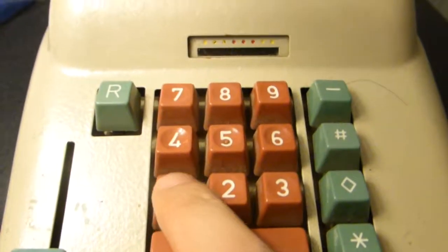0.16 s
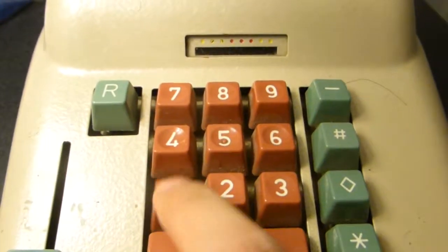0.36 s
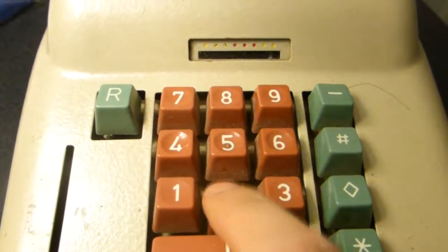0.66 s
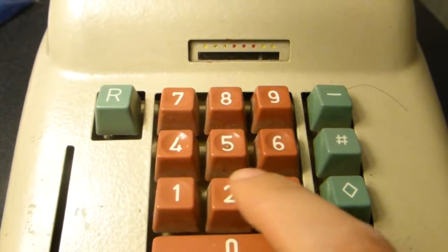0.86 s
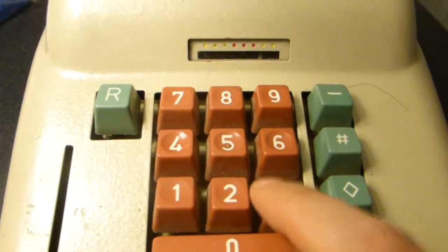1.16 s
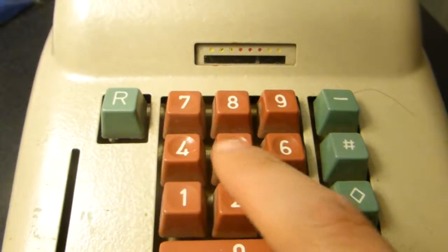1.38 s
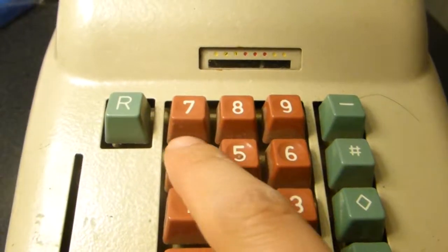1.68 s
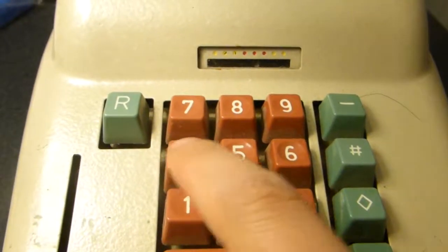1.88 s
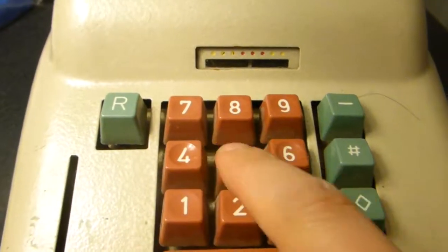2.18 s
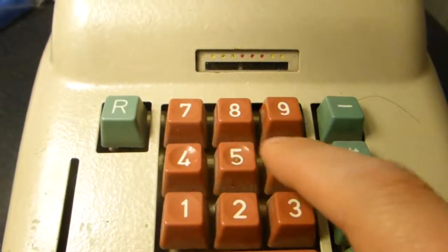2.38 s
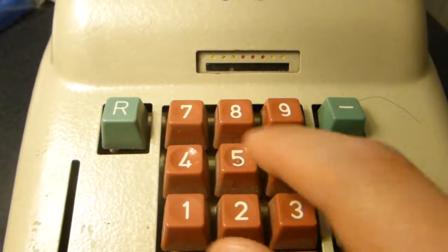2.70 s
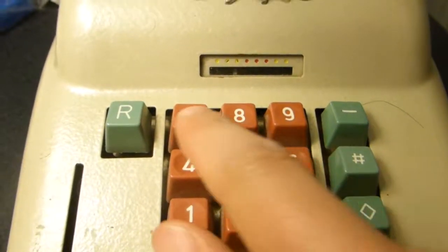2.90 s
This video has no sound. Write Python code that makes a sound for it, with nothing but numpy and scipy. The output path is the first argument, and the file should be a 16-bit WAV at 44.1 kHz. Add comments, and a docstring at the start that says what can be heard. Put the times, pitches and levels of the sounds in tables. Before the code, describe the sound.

Mechanical adding machine keys clack sharply, six separate presses and spring-back releases in a quiet room

```python
"""Keys of an old adding machine

A finger types six digits on a mechanical adding machine, close to the microphones in a small quiet room.
Keys trip latches and click the linkage, bottom on their stops, rub in their guides and snap back on springs.
Each contact is a filtered noise crack with the ringing modes of the part and of the steel frame.
The room answers with decaying diffuse noise, over coloured air noise and a low hum that settle in level.
"""
import sys
import numpy as np
from scipy import signal
from scipy.fft import rfft, irfft, next_fast_len
from scipy.io import wavfile
from scipy.ndimage import map_coordinates

SR = 44100
rng = np.random.default_rng(int(sys.argv[2]) if len(sys.argv) > 2 else 0)


def waveform_to_disk(signal):
    """Save audio, clipped to [-1, 1], as 16-bit WAV at the path in sys.argv[1]."""
    frames = np.transpose(np.atleast_2d(signal))
    scaled = np.clip(frames, -1, 1) * 32767
    samples = np.round(scaled).astype(np.int16)
    wavfile.write(sys.argv[1], SR, samples)


N = 134505
T = np.arange(SR // 2) / SR  # time within one contact, s

# Keys meeting their lower stops: (t/s, level/dB, ring f/Hz, low knock/dB, treble/dB)
KEY_STOPS = [(0.273, -14.5, 8330, 2.5, 4), (0.2756, -23, 7900, 11, 12), (0.7409, -15.5, 11460, 5.5, 14.5),
             (0.7462, -16, 7660, -2, 7), (1.1427, -16.5, 11300, -2, 13.5), (1.814, -17, 8960, -12.5, 0.5),
             (1.818, -20, 8170, 0.5, 11), (2.2503, -16.5, 6540, 2.5, 8), (2.255, -17, 7800, 1, 7.5),
             (2.6306, -17.5, 6360, -13, 4), (2.6345, -20.5, 3580, -7, 0)]
# Spectrum of a stop contact: (f/Hz, gain/dB)
STOP_SPECTRUM = [(80, -28), (480, -2.5), (1000, -10.5), (1600, -0.5), (2700, -4), (4500, 5.5), (7500, 1),
                 (12500, -4.5), (15500, -14)]


def presses():
    """Impact excitation: a key bottoms or rebounds, and the blow excites a broadband crack and a ring."""
    out = np.zeros((2, N))
    for start, db, ring_hz, knock_db, treble_db in KEY_STOPS:
        hit = contact(STOP_SPECTRUM, ring_hz, knock_db, treble_db,
                      crack_t60=0.028, case_db=-4.5, ring_db=-3.5, ring_t60=0.014)
        add(out, start, amp(db) * hit)
    return out


# Keys snapping back on their springs: (t/s, level/dB, ring f/Hz, low knock/dB, treble/dB)
KEY_RETURNS = [(0.4889, -11.5, 3800, 3.5, 1), (0.9061, -13.5, 4380, 3, 3), (1.2902, -14.5, 4340, 2.5, -1.5),
               (1.9704, -13.5, 3960.0, -1, 2), (2.375, -15.5, 3720, 2.5, -1), (2.7504, -14.5, 3710, 0.5, 0)]
# Spectrum of a return contact: (f/Hz, gain/dB)
RETURN_SPECTRUM = [(80, -30.5), (600, -4), (1200, -5.5), (1650, 2.5), (2700, -3.5), (3900, 9.5), (5200, 4),
                   (7500, 1), (12500, 2.5), (15500, -4.5)]


def releases(run_up_db=-4):
    """Elastic recoil: the spring throws each key into its upper stop, after a short swell of friction."""
    out = np.zeros((2, N))
    for start, db, ring_hz, knock_db, treble_db in KEY_RETURNS:
        add(out, start - RUN_UP_S, amp(db) * run_up(RUN_UP_S, run_up_db))
        hit = contact(RETURN_SPECTRUM, ring_hz, knock_db, treble_db,
                      crack_t60=0.0058, case_db=-2.5, ring_db=-5, ring_t60=0.02)
        add(out, start, amp(db) * hit)
    return out


# Latches tripping or letting go: (t/s, level/dB, brightness/dB, ring f/Hz)
LATCH_SNAPS = [(0.2111, -20, -0.5, 4500), (0.4271, -23, 1, 9430), (0.7046, -20.5, 12.5, 11170),
               (1.1035, -20, 14, 11200), (1.7742, -24, 0, 7520), (2.2151, -20, 11, 7940),
               (2.3405, -20.5, 12.5, 10530), (2.7137, -18.5, 8.5, 6170)]
# Natural modes shared by the latches: (f/Hz)
LATCH_MODES = [2400, 4050, 7490, 8120, 8740, 11240]


def latches(run_up_db=-14):
    """Modal excitation: each latch snaps with a short crack and sets a fixed group of modes ringing."""
    out = np.zeros((2, N))
    for start, db, bright_db, ring_hz in LATCH_SNAPS:
        add(out, start - RUN_UP_S, amp(db) * run_up(RUN_UP_S, run_up_db))
        snap = contact(CLICK_SPECTRUM, ring_hz, -bright_db / 2, bright_db / 2,
                       crack_t60=0.0098, case_db=-0.5, ring_db=-3.5, ring_t60=0.023,
                       modes_hz=LATCH_MODES, modes_db=-6.5)
        add(out, start, amp(db) * snap)
    return out


# Levers and pawls ticking along the linkage: (t/s, level/dB, brightness/dB)
LINKAGE_CLICKS = [(0.2433, -25.5, -4), (0.2504, -22, -3), (0.4619, -18.5, 1.5), (0.469, -28, 0),
                  (0.6997, -35, 20), (0.7216, -27, 24), (0.7351, -21, 6), (0.8248, -31, 13),
                  (0.8413, -33, 22), (0.8528, -30, 29), (0.8792, -26, 6), (0.885, -27.5, 28),
                  (1.0997, -24, 5), (1.1167, -30.5, 13), (1.1385, -18, 5), (1.2563, -28.0, -2),
                  (1.5313, -44.5, 19), (1.7989, -27.5, -7), (1.938, -26, 2), (2.2121, -19, 4),
                  (2.2296, -21, 6), (2.3502, -23, 18), (2.5938, -22.5, 4.5), (2.624, -23.5, 2),
                  (2.6796, -37.5, -12)]
# Spectrum of small metal contacts and friction: (f/Hz, gain/dB)
CLICK_SPECTRUM = [(100, -22), (450, 0.5), (1000, -8.5), (1700, -2), (4000, 3.5), (6000, 1.5), (11500, 2),
                  (13500, -4.5), (15500, -9)]
PAWL_HZ = 10840  # ring of a small pawl


def linkage():
    """Spectral tilt of light impacts: small levers click, and brighter clicks have less low knock."""
    out = np.zeros((2, N))
    for start, db, bright_db in LINKAGE_CLICKS:
        click = contact(CLICK_SPECTRUM, PAWL_HZ, -bright_db / 2, bright_db / 2,
                        crack_t60=0.0042, case_db=-5, ring_db=-13, ring_t60=0.005)
        add(out, start, amp(db) * click)
    return out


# Key stems rubbing in their guides: (start t/s, end t/s, level/dB)
STEM_SLIDES = [(0.195, 0.209, -35), (0.24, 0.284, -25), (0.445, 0.472, -29), (0.717, 0.758, -27.5),
               (0.852, 0.91, -39.5), (1.1, 1.166, -32), (1.235, 1.286, -36.5), (1.789, 1.837, -26.5),
               (1.867, 1.989, -40), (2.29, 2.382, -37.5), (2.583, 2.631, -32.5), (2.66, 2.765, -37.5)]


def stems():
    """Sliding friction: key stems scrape in their guides, fading in and out at the ends of the motion."""
    out = np.zeros((2, N))
    for start, end, db in STEM_SLIDES:
        count = round(abs(end - start) * SR)
        add(out, start, amp(db) * signal.windows.tukey(count, .3) * scrape(count))
    return out


# Soft knocks of the hollow case: (t/s, level/dB, f/Hz)
CASE_THUDS = [(2.628, -27, 484)]
THUD_T60_S = .07


def thuds():
    """Damped resonance: the hollow case answers with a low decaying sine of gentle onset."""
    out = np.zeros((2, N))
    for start, db, hz in CASE_THUDS:
        envelope = (1 - np.exp(-T * hz)) * fade(THUD_T60_S)
        add(out, start, amp(db) * envelope * np.sin(2 * np.pi * hz * T))
    return out


ATTACK_S, CASE_T60_S = .0003, 0.053  # onset time constant; decay of the case rattle
KNOCK_HZ, TREBLE_HZ = 2580, 8100  # corners of the low and high shelves
# Further modes of each part: level beside the crack, decay and frequency range
PART_MODES_DB, PART_MODES_T60_S, PART_LOW_HZ, PART_HIGH_HZ = -13, 0.027, 3170, 13120
FRAME_HZ, FRAME_DB, FRAME_T60_S = 4350, -38, 0.17  # faint after-ring of the steel frame
RING_BLUR_HZ = 90  # loose parts chatter, which widens their ring


def contact(colour, ring_hz, knock_db, treble_db, crack_t60, case_db, ring_db, ring_t60,
            modes_hz=None, modes_db=PART_MODES_DB):
    """Modal superposition: crack, case rattle, part and frame rings sum with the room's answer."""
    rise = 1 - np.exp(-T / ATTACK_S)
    decay = fade(crack_t60) + amp(case_db) * fade(CASE_T60_S)
    burst = noise(DIRECT_WIDTH, len(T)) * rise * decay
    if modes_hz is None:
        modes_hz = rng.uniform(PART_LOW_HZ, PART_HIGH_HZ, size=6)
    tones = sum(np.sin(2 * np.pi * (hz * T + rng.random())) for hz in modes_hz)
    modes = rise * fade(PART_MODES_T60_S) * tones

    def shelves(hz):
        """Shelving filters: the low knock and the treble are raised or lowered separately."""
        knock = knock_db / (1 + (hz / KNOCK_HZ) ** 4)
        treble = treble_db / (1 + (TREBLE_HZ / (hz + 1)) ** 8)
        return knock + treble

    parts = np.vstack([burst / strike_level(burst), modes / strike_level(modes)])
    parts = coloured(parts, lambda hz: along(colour, hz) + shelves(hz))
    crack, modes = np.split(parts / strike_level(parts[:2]), [2])

    # A random walk in phase widens each spectral line
    wander = np.cumsum(rng.standard_normal(len(T))) * np.sqrt(2 * np.pi * RING_BLUR_HZ / SR)
    ring = rise * fade(ring_t60) * np.sin(2 * np.pi * ring_hz * T + wander)
    frame = amp(FRAME_DB) * fade(FRAME_T60_S) * rise * np.sin(2 * np.pi * FRAME_HZ * T + wander)

    # The blow and the rattle both feed the room
    jolt = signal.unit_impulse(len(T)) + burst[0] / np.linalg.norm(burst[0])
    radiated = coloured(jolt, lambda hz: (along(colour, hz) + along(CLICK_SPECTRUM, hz) + shelves(hz)) / 2)
    radiated = radiated[None] / strike_level(radiated)
    wet = signal.fftconvolve(radiated, room_tail(), axes=1)[:, :len(T)]
    return crack + amp(modes_db) * modes + amp(ring_db) * ring / strike_level(ring) + wet + frame


RUN_UP_S = 0.0046  # a part scrapes this long before it strikes


def run_up(length_s, db, swell_db=13):
    """Accelerating friction: the scrape of a part swells until it strikes."""
    swell = amp(np.linspace(-swell_db, 0, round(length_s * SR)) + db)
    return swell * scrape(len(swell))


TICKS_PER_S, TICK_T60_S, TICK_SCATTER_DB = 700, .0035, 3.2
RUB_DB = -2  # smooth rubbing noise beside the ticks, before colouring


def scrape(count):
    """Asperity contact: friction is smooth noise plus tiny ticks of random size and pitches, rms 1."""
    ticks = np.zeros((2, count))
    for _ in range(1 + round(TICKS_PER_S * count / SR)):
        pitches = rng.uniform(PART_LOW_HZ, PART_HIGH_HZ, size=(4, 1))
        ring = np.sin(2 * np.pi * pitches * T[:count]).sum(0)
        size = amp(TICK_SCATTER_DB * rng.standard_normal())
        add(ticks, rng.random() * count / SR, size * ring * fade(TICK_T60_S)[:count])
    friction = unit(ticks) + amp(RUB_DB) * noise(DIRECT_WIDTH, count)
    return unit(coloured(friction, lambda hz: along(CLICK_SPECTRUM, hz)))


# Reverberation time of the room: (f/Hz, T60/s)
ROOM_DECAY = [(200, 0.28), (9000, 0.29), (15000, 0.19)]
ROOM_DB, ROOM_RISE_S, ROOM_WIDTH = -10, 0.0016, 0.15  # level, onset time constant, side over mid


def room_tail():
    """Diffuse reverberation: noise decays exponentially in each frequency band."""
    hz, t, bands = signal.stft(noise(ROOM_WIDTH, len(T)), SR, nperseg=256)
    decaying = bands * fade(along(ROOM_DECAY, hz)[:, None], t)
    tail = signal.istft(decaying, SR, nperseg=256)[1][:, :len(T)]
    tail = tail * (1 - np.exp(-T / ROOM_RISE_S))
    return amp(ROOM_DB) * unit(tail) / np.sqrt(len(T))


# Spectral density of the room air: (f/Hz, relative level/dB per Hz)
AIR_SPECTRUM = [(60, -29), (125, -5), (300, -0.5), (900, -7.5), (1300, -12.5), (2500, -20), (6000, -27),
                (12500, -27.5), (15500, -40)]
# Tones of the hum, levels before settling: (f/Hz, level/dB)
HUM_TONES = [(226, -59.5), (285, -59)]
AIR_DB, AIR_WIDTH = -48, 0.3  # level before settling; side over mid
HUM_DRIFT, HUM_DRIFT_PER_S = 1.17, 14  # phase wander/rad and its random points per second


def background():
    """Stationary noise and phase modulation: coloured room air under low tones of wandering phase."""
    t = np.arange(N) / SR
    air = unit(coloured(noise(AIR_WIDTH, N), lambda hz: along(AIR_SPECTRUM, hz)))
    hum = 0
    for hz, db in HUM_TONES:
        wander = map_coordinates(rng.standard_normal(256), [t * HUM_DRIFT_PER_S], mode="mirror")
        hum = hum + amp(db) * np.sqrt(2) * np.sin(2 * np.pi * hz * t + HUM_DRIFT * wander)
    return amp(AIR_DB) * air + hum


# The background settles: (t/s, gain/dB)
BACKGROUND_GAIN = [(.25, 4.5), (.85, 0.93)]


def scene():
    """Linear superposition: the machine's sounds add to the settling background."""
    settling = amp(np.interp(np.arange(N) / SR, *np.transpose(BACKGROUND_GAIN)))
    machine = presses() + releases() + latches() + linkage() + stems() + thuds()
    return machine + settling * background()


# Peak and notch of the microphones: (f/Hz, width/Hz, gain/dB)
MIC_RESPONSE = [(8450, 580, 3), (9070, 245, -8.5)]
# Stereo width: (f/Hz, side gain/dB)
SIDE_GAIN = [(25, 15), (130, -21), (500, -8), (1300, 5.5), (2500, 4), (3400, -6), (6000, 2.5), (13000, 10)]
LOW_CUT_HZ, TOP_HZ = 87, 15650  # low cut and upper band limit


def record(dry):
    """Transducer response: the close microphone pair colours, spreads, clips and band-limits the sound."""
    def response(hz):
        """Resonance and low cut: Gaussian peak and notch in dB over a falling bass."""
        bumps = sum(db * np.exp(-.5 * ((hz - centre) / width) ** 2) for centre, width, db in MIC_RESPONSE)
        return bumps - 10 * np.log10(1 + (LOW_CUT_HZ / (hz + 10)) ** 2)

    left, right = coloured(dry, response)
    mid = (left + right) / 2
    side = coloured((left - right) / 2, lambda hz: along(SIDE_GAIN, hz))
    clipped = np.clip([mid + side, mid - side], -1, 1)  # full scale
    m = next_fast_len(N + SR // 2)
    keep = np.clip((TOP_HZ - np.fft.rfftfreq(m, 1 / SR)) / 300 + .5, 0, 1)  # slope 300 Hz wide
    return irfft(rfft(clipped, m) * keep, m)[:, :N]


def amp(db):
    """Logarithmic level: decibels to amplitude gain."""
    return 10 ** (np.asarray(db) / 20)


def unit(x):
    """Effective value: scale to rms 1."""
    return x / np.sqrt(np.mean(x ** 2) + 1e-20)


def along(points, hz):
    """Logarithmic frequency scale: interpolate (f/Hz, value) points."""
    f, value = np.transpose(points)
    return np.interp(np.log(hz + 1), np.log(f + 1), value)


def fade(t60, t=T):
    """Exponential damping: decay by 60 dB in t60 seconds."""
    return np.exp(-np.log(1000) * t / t60)


def coloured(x, gain_db):
    """Minimum-phase filtering: a causal filter of gain gain_db(Hz), built by folding its cepstrum."""
    n = x.shape[-1]
    m = 2 * next_fast_len(n // 2 + 2048, True)
    cepstrum = irfft(np.log(amp(gain_db(np.fft.rfftfreq(m, 1 / SR)))), m)
    cepstrum[1:m // 2] *= 2
    cepstrum[m // 2 + 1:] = 0
    return irfft(rfft(x, m) * np.exp(rfft(cepstrum)), m)[..., :n]


DIRECT_WIDTH = .12  # side over mid of the cracks and friction noise


def noise(width, count):
    """Mid-side decomposition: stereo white noise whose width is side over mid."""
    mid, side = rng.standard_normal((2, count))
    return np.array([mid + width * side, mid - width * side])


def add(out, start, x):
    """Superposition: mix x into out from time start in seconds."""
    part = out[:, max(round(start * SR), 0):][:, :x.shape[-1]]
    part += x[..., :part.shape[1]]


def strike_level(x):
    """Short-time level: rms over the first 4.5 ms of a contact."""
    return np.sqrt(np.mean(x[..., :200] ** 2))


dry = scene()
out = record(dry)
waveform_to_disk(out)
```